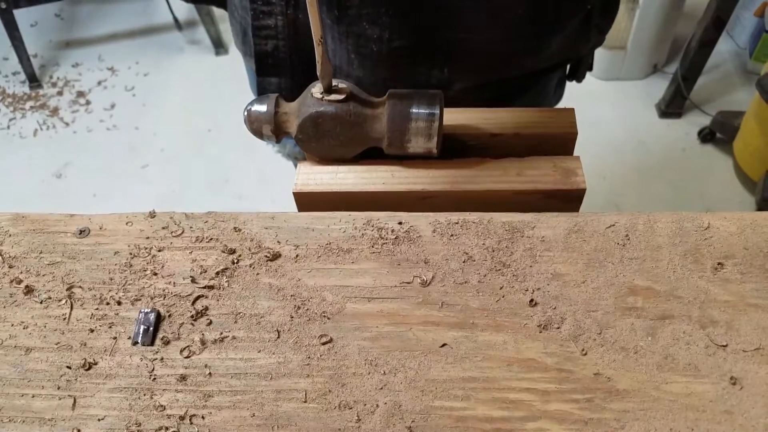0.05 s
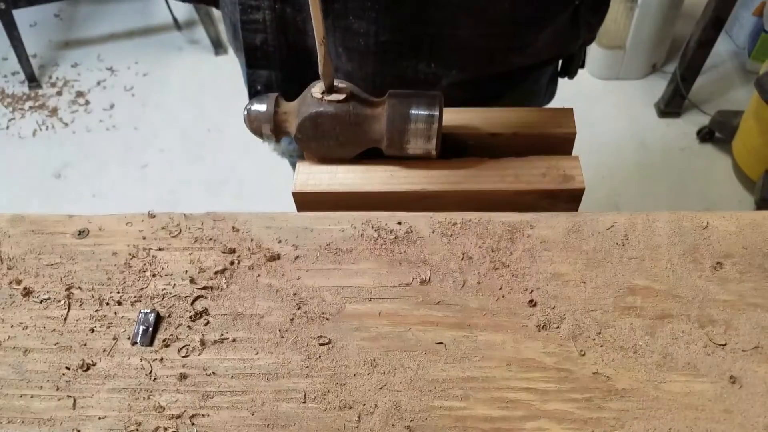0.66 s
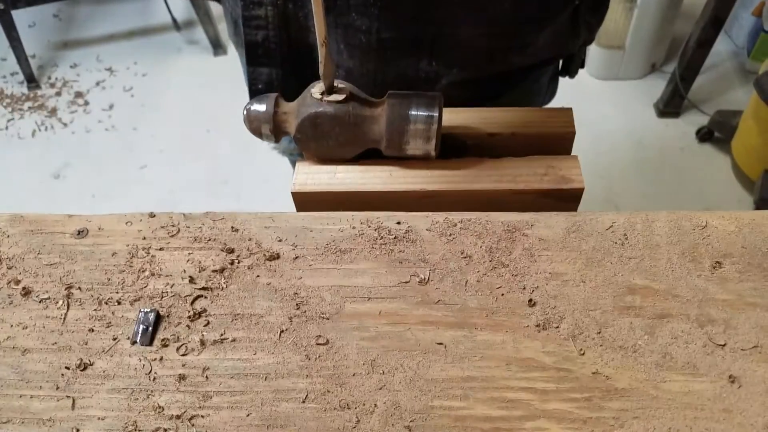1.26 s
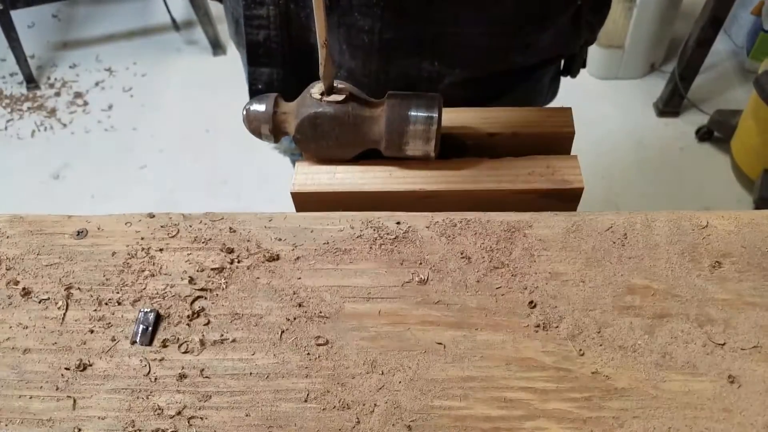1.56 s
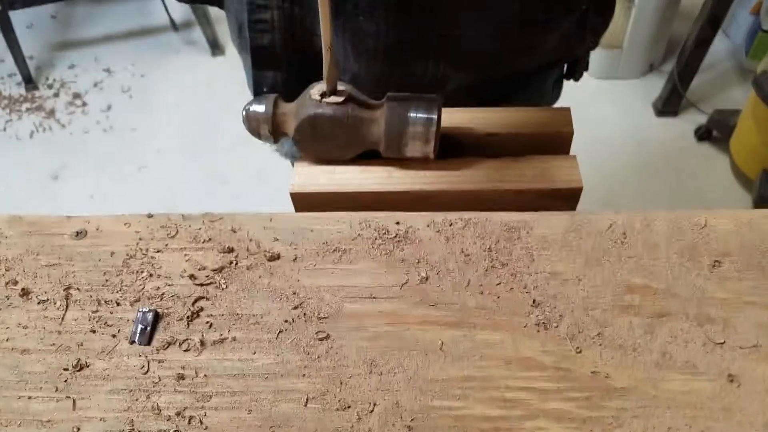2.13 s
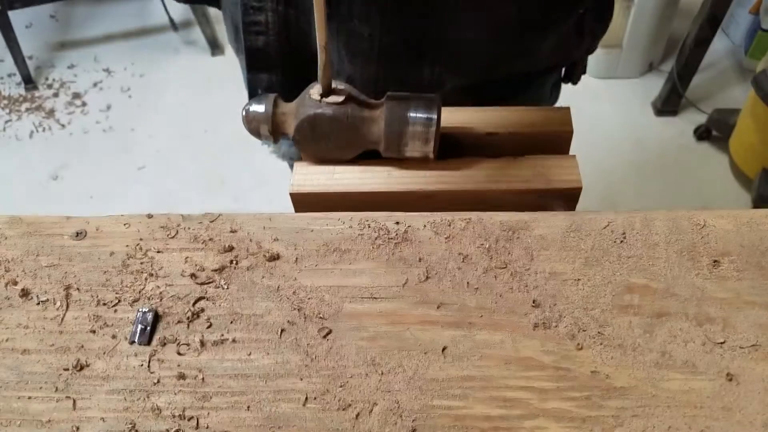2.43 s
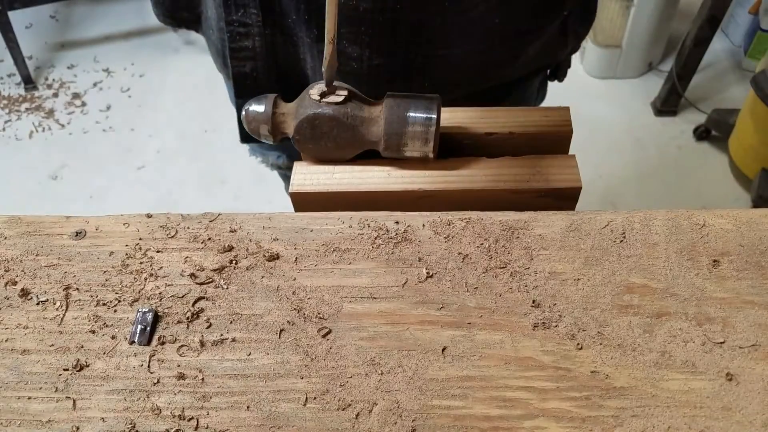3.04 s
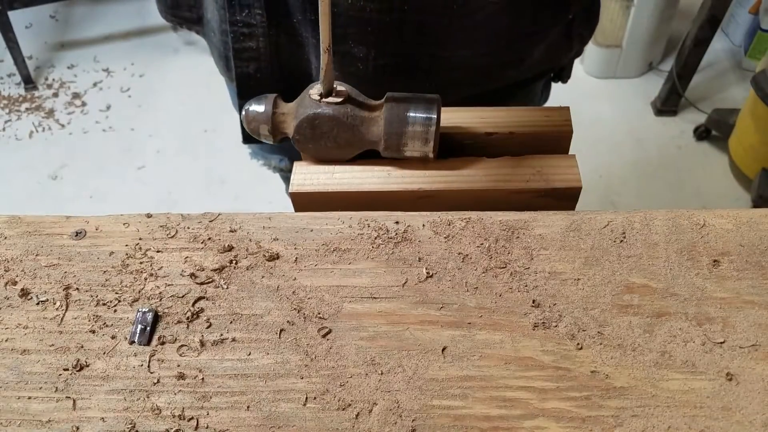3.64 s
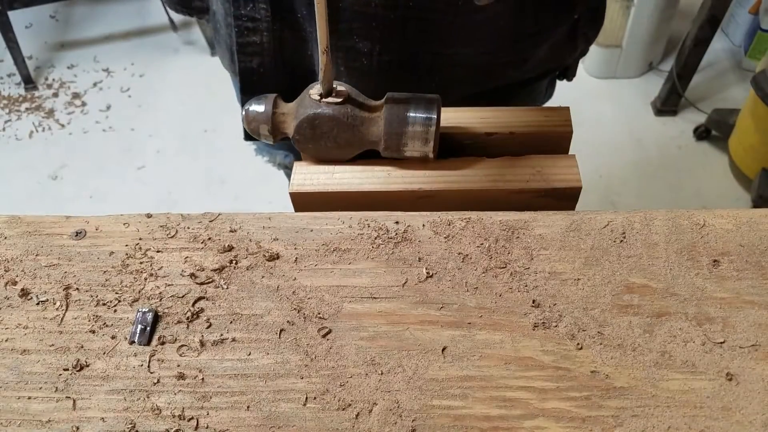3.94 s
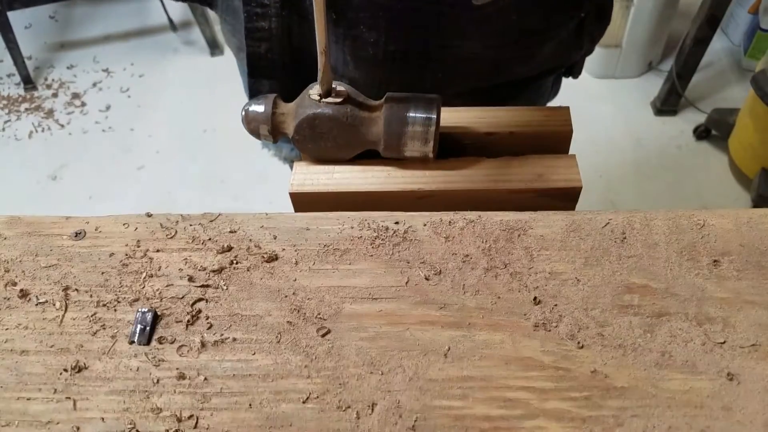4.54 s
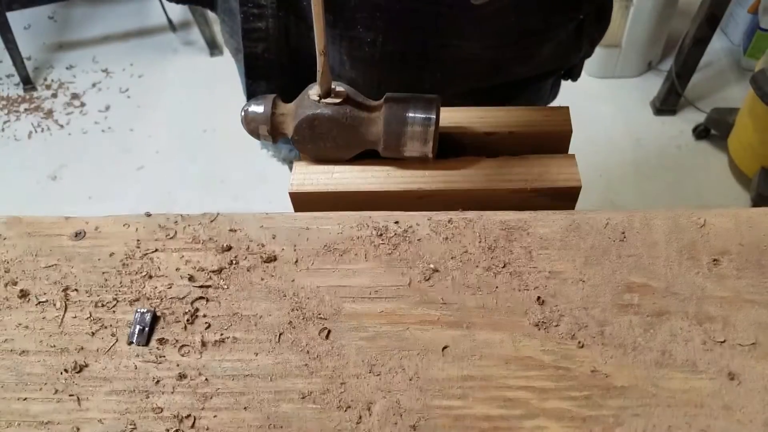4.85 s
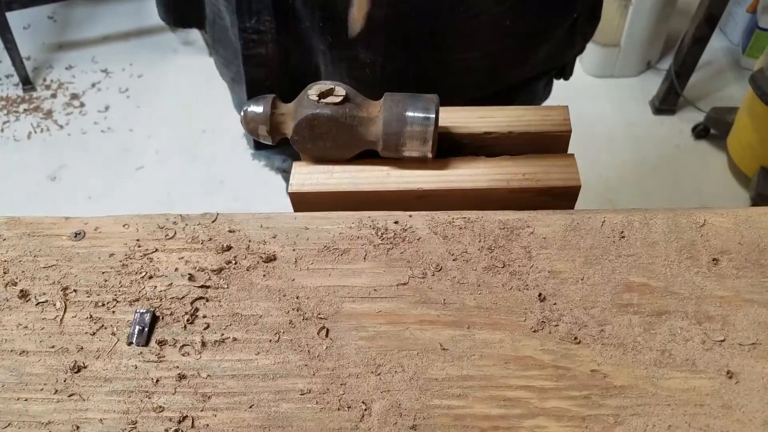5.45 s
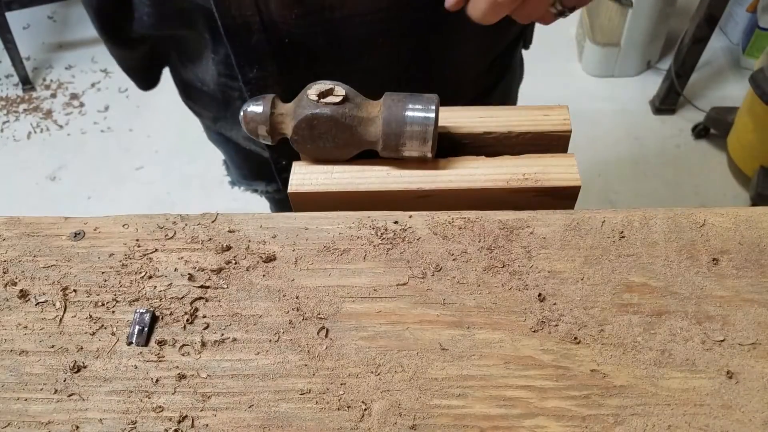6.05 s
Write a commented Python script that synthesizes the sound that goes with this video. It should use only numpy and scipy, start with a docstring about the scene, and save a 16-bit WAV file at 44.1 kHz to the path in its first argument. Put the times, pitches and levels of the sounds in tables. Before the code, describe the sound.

Close, steady hammering of steel on a screwdriver thumps through a wooden workbench, with brief ringing and loose pieces clacking. The blows stop for a few light ticks, then resume for four more strikes. A piston machine, probably a compressor, pulses rapidly on the left of the workshop, its hiss growing and swelling in the gaps. Finally the screwdriver lands on the bench with a quick clatter.

```python
"""A hammer drives a screwdriver against the wedge of a hammer head lying on wooden blocks on a bench.
Each blow is a steel click, a bench thump and a short ring of the tools; loose pieces clack after it.
The tip ticks on the wedge in a pause; at the end the screwdriver drops on the bench and rocks.
A piston machine, probably a compressor, throbs and hisses ever louder on the left.
Automatic gain control lifts it in the pauses; a limiter squashes the blows."""
import sys
import numpy as np
from scipy import signal
from scipy.fft import rfft, irfft, next_fast_len
from scipy.io import wavfile
from scipy.ndimage import minimum_filter1d

SR = 44100
rng = np.random.default_rng(int(sys.argv[2]) if len(sys.argv) > 2 else 0)


def inscribe(sig):
    """Save sig as 16-bit PCM at rate SR to the path in sys.argv[1].

    A 1-D sig is mono; a 2-D sig holds one channel per row.
    Samples are clipped to [-1, 1] before scaling.
    """
    pcm = np.round(np.clip(np.atleast_2d(sig).T, -1, 1) * 32767)
    wavfile.write(sys.argv[1], SR, pcm.astype(np.int16))


N = 277388
TIME = np.arange(N) / SR
RING_TIME = np.arange(int(.6 * SR)) / SR
STROKE_HZ = 16.147

# hammer blows: (time [s], force [dB])
BLOWS = [(-.125, 2), (0.2494, 1), (0.6231, 1), (1.0041, 0), (1.3658, 1.5), (1.7232, 2.5), (2.0907, 2.5),
         (2.4436, 1.5), (4.139, 4), (4.476, 2), (4.8254, 3), (5.1634, 3)]
# stereo balance: (frequency [Hz], left over right [dB])
BALANCE = [(60, 10.5), (200, 8), (400, 9), (700, 10), (1300, 6), (2500, 7), (5000, 1.5), (9000, 1.5),
           (15000, 1)]
# left-right likeness: (frequency [Hz], correlation [-1..1])
CORRELATION = [(60, 1), (200, 0.88), (400, 0.81), (700, -0.12), (1400, -0.18), (3000, 0.23), (6000, -0.22),
               (15000, 0.064)]
# narrow room peaks and dips: one value per 50 Hz and channel
ROOM_RIPPLE = rng.standard_normal((2, 442))


def amp(db):
    """Decibels to amplitude."""
    return 10 ** (np.asarray(db) / 20)


def read(points, hz):
    """Table lookup, linear over log frequency."""
    f, value = np.transpose(points)
    return np.interp(np.log(hz + 1), np.log(f + 1), value)


def add(mix, time_s, sound):
    """Mixes a stereo sound in, cropped to the scene."""
    start = round(time_s * SR)
    sound = sound[:, max(-start, 0):]
    part = mix[:, max(start, 0):][:, :sound.shape[1]]
    part += sound[:, :part.shape[1]]


def noise(spectrum, size=len(RING_TIME), ripple_db=3):
    """Partly correlated stereo noise, coloured by spectrum (Hz, dB) and the room."""
    hz = np.fft.rfftfreq(size, 1 / SR)
    left, other = rfft(rng.standard_normal((2, size)))
    corr = read(CORRELATION, hz)
    right = (corr * left + np.sqrt(1 - corr ** 2) * other) * amp(-read(BALANCE, hz))
    ripple = np.array([np.interp(hz, np.linspace(0, SR / 2, len(r)), r) for r in ROOM_RIPPLE])
    ripple *= hz / (hz + 600)  # smoother in the bass
    return irfft(np.array([left, right]) * amp(read(spectrum, hz) + ripple_db * ripple), size)


def long_noise(spectrum):
    """Scene-long coloured noise."""
    return noise(spectrum, next_fast_len(N))[:, :N]


def tone(hz, db, cycles):
    """Steady stereo sine; hz sets the balance."""
    return amp([[db], [db - read(BALANCE, hz)]]) * np.sin(2 * np.pi * cycles)


def fade(t60_s):
    """Exponential decay, 60 dB in t60_s."""
    return np.exp(-np.log(1000) * RING_TIME / t60_s)


def onset(rise_s):
    """Smooth rise from silence."""
    return 1 - np.exp(-(RING_TIME / rise_s) ** 2)


def hammer(click_db=-2, ring_db=-1, thump_db=-1.5, bite_db=-7, bite_hz=2510, fresh_share=0.39):
    """Steel meets steel, then the bench answers; part of its boom varies with the contact point."""
    # hammer skips and touches again: (time [s], click level [dB])
    skips = [(4.1482, 3), (4.1526, 2)]
    bench_delay_s = 0.001221  # travel down the screwdriver
    out = np.zeros((2, N))
    common_boom = bench_boom()
    thump = amp(thump_db) * bench_thump()
    bite = amp(bite_db) * np.sin(2 * np.pi * bite_hz * RING_TIME) * fade(0.0095) * onset(0.00095)
    for time_s, force_db in BLOWS:
        boom = np.sqrt(1 - fresh_share) * common_boom + np.sqrt(fresh_share) * bench_boom()
        steel = bite + amp(click_db) * click() + amp(ring_db) * steel_ring()
        add(out, time_s, amp(force_db) * steel)
        add(out, time_s + bench_delay_s, amp(force_db) * (boom * onset(0.0014) + thump))
    for time_s, db in skips:
        add(out, time_s, amp(db) * click())
    return out


def click(t60_s=0.019):
    """A few milliseconds of hard contact."""
    # steel on steel: (frequency [Hz], level [dB])
    spectrum = [(300, -61), (900, -30.5), (1500, 0), (2000, 2), (2500, 2), (3200, -4), (4000, -16),
                (7000, -13), (9000, -27.5), (11000, -22), (15500, -28)]
    return noise(spectrum) * fade(t60_s) * onset(0.0004)


def steel_ring(max_detune=0.00303, partials=4):
    """The tools ring; each mode is a cluster of close, beating partials."""
    # shank and hammer heads: (frequency [Hz], level [dB], t60 [s])
    modes = [(1920, -42, .25), (2210, -39, .28), (2460, -33, .26), (2915, -32, .28), (3040, -33, .3),
             (4735, -39, .34), (5855, -45, .29), (6150, -44, .29), (6605, -49, .23), (9170, -49, .32),
             (14790, -40, .27), (14950, -46, .24)]
    out = np.zeros((2, len(RING_TIME)))
    for hz, db, t60_s in modes:
        partial_hz = hz * (1 + max_detune * rng.uniform(-1, 1, (2, partials, 1)))
        cycles = partial_hz * RING_TIME + rng.random((2, partials, 1))
        cluster = np.sin(2 * np.pi * cycles).sum(1) / np.sqrt(partials)
        out += amp([[db], [db - read(BALANCE, hz)]]) * fade(t60_s) * cluster
    return out * onset(0.0014)


def bench_thump(rise_s=0.003):
    """Damped bench modes of alternating sign, weaker and phase-shifted on the right."""
    # bench and blocks: (frequency [Hz], level [dB], t60 [s])
    modes = [(53.8, -29.5, 0.79), (79.4, -24, 0.44), (82.3, -29, 0.19), (95.2, -19, 0.26),
             (127.1, -2.5, 0.21), (133.3, -11.5, 0.18), (157, -12.5, 0.34), (176.65, -14.5, 0.48),
             (198.6, -12.5, 0.18), (237.5, 1, 0.085), (267.6, -18.5, 0.77), (274.5, -0.5, 0.092),
             (341.4, -19.5, 0.3), (408.6, -20.5, 0.37), (465.3, -14, .22), (582, -19.5, 0.27),
             (689, -13, 0.23), (1100, -44, 0.41)]
    out = np.zeros((2, len(RING_TIME)))
    for k, (hz, db, t60_s) in enumerate(modes):
        phase = 2 * np.pi * hz * RING_TIME
        lag_rad = np.arccos(read(CORRELATION, hz))
        stereo = np.array([np.sin(phase), amp(-read(BALANCE, hz)) * np.sin(phase - lag_rad)])
        out += (-1) ** k * amp(db) * fade(t60_s) * stereo
    return out * onset(rise_s)


def bench_boom():
    """Dense small modes and reflections; each band decays at its own rate."""
    # bench and room: (frequency [Hz], level [dB])
    spectrum = [(25, -32), (70, -19), (130, 0), (300, 7.5), (650, 3.5), (1100, -0.5), (1600, -6),
                (2700, -15), (3600, -23.5), (6200, -29.5), (8500, -39.5), (11000, -38.5), (15500, -42)]
    # their decay: (frequency [Hz], t60 [s])
    decay_times = [(60, 0.89), (300, 0.34), (1000, 0.31), (3000, 0.33), (8000, 0.31), (15000, 0.17)]
    hz, time_s, bands = signal.stft(noise(spectrum), SR, nperseg=512)
    bands *= np.exp(-np.log(1000) * time_s / read(decay_times, hz)[:, None])
    return signal.istft(bands, SR)[1][:, :len(RING_TIME)]


def chatter(flight_s=.05, spread_s=0.015, level_db=-11, spread_db=2, t60_s=0.078, clacks=3):
    """Small clacks after each blow, probably the blocks and a spare wedge hopping."""
    # loose pieces falling back: (frequency [Hz], level [dB])
    spectrum = [(300, -27), (1300, -4.5), (2400, -7.5), (3600, -19.5), (6500, -25), (8500, -48),
                (10400, -29.5), (12000, -64), (15500, -37)]
    out = np.zeros((2, N))
    envelope = (fade(t60_s) * onset(0.0005))[:SR // 10]
    for time_s, force_db in BLOWS:
        for late, strength in rng.standard_normal((clacks, 2)):
            clack = noise(spectrum, len(envelope)) * envelope
            db = force_db + level_db + spread_db * strength
            add(out, time_s + flight_s + spread_s * late, amp(db) * clack)
    return out


def compressor(first_stroke_s=.047, loose_db=-8):
    """Pump partials swell together and the casing clatters once a stroke; the motor hums."""
    # pump throb: (multiple of stroke rate [1], level [dB])
    harmonics = [(6, -55), (7, -35.5), (8, -41), (9, -40), (10, -58.5), (11, -50), (12, -52), (16, -49.5),
                 (17, -64)]
    # motor and casing tones: (frequency [Hz], level [dB])
    hum_tones = [(120, -38.5), (240, -37.5), (307, -54.5), (360, -51), (387.5, -52), (533, -56.5),
                 (597.4, -51), (662, -51.5), (872, -55.5)]
    # casing clatter: (frequency [Hz], level [dB])
    casing = [(30, -51), (70, -43), (110, -15.5), (200, -35), (380, -25.5), (480, -32.5), (660, -27.5),
              (1100, -43.5), (2200, -46.5), (3500, -58.5), (7000, -75), (15000, -74)]
    strokes = STROKE_HZ * (TIME - first_stroke_s)
    throb = sum(tone(k * STROKE_HZ, db, k * strokes) for k, db in harmonics)
    hum = sum(tone(hz, db, hz * TIME + rng.random()) for hz, db in hum_tones)
    period = round(SR / STROKE_HZ)
    clatter = noise(casing, period)[:, np.arange(N) % period]
    return throb + hum + clatter + amp(loose_db) * long_noise(casing)


def air(leak_db=-25.5, ramp_start_s=2.36, flow_per_s=0.25, first_puff_s=0.0089, puff_depth=0.21):
    """A faint leak grows to a rush; the valves give a whistling chuff at each opening."""
    # valve whistles: (frequency [Hz], half width [Hz], level [dB])
    valves = [(872, 61, -6.5), (2260, 57, -20.5), (5190, 30, -34.5)]
    # rushing air: (frequency [Hz], level [dB])
    spectrum = [(200, -41), (500, -29.5), (900, -19), (1150, -32.5), (1500, -29.5), (2200, -33),
                (3200, -37.5), (3800, -42), (5100, -42.5), (5230, -36.5), (5400, -47), (7200, -46),
                (9000, -65), (11500, -57.5), (14000, -62.5), (15400, -53.5)]
    flow = amp(leak_db) + flow_per_s * np.maximum(TIME - ramp_start_s, 0)  # 1 = full flow
    opening = (1 + np.cos(2 * np.pi * STROKE_HZ * (TIME - first_puff_s))) / 2
    hz = np.geomspace(100, 16000, 900)
    resonance = sum(amp(db) / (1 + ((hz - centre) / width) ** 4) for centre, width, db in valves)
    whistles = long_noise(np.c_[hz, 20 * np.log10(resonance)]) * opening ** 2
    rush = long_noise(spectrum) * (1 + puff_depth * (2 * opening - 1))
    return rush * flow + whistles * flow ** 2.65  # whistles grow faster than the rush


def tip(settle_s=0.014, settle_db=2, settle_pitch_ratio=.85):
    """The tip is set back on the wedge and settles with a second, lower tick."""
    # touches: (time [s], level [dB], pitch [Hz])
    touches = [(3.098, -32.5, 1210), (3.242, -37, 1210), (3.508, -39, 1370)]
    out = np.zeros((2, N))
    for time_s, db, hz in touches:
        add(out, time_s, amp(db) * tick(hz))
        add(out, time_s + settle_s, amp(db + settle_db) * tick(hz * settle_pitch_ratio))
    return out


def tick(hz, width_hz=170, t60_s=0.074):
    """Pitched tick of the blade: a burst of narrowband noise."""
    band = [(hz - 2 * width_hz, -45), (hz - width_hz / 2, 0),
            (hz + width_hz / 2, 0), (hz + 3 * width_hz, -50)]
    grain = noise(band)
    return grain / grain[0].std() * fade(t60_s) * onset(0.00066)


def landing(landing_hz=1320, rocking_hz=520, dulling_s=0.024, click_loss_db_per_s=400, room_db=-13):
    """The screwdriver hits the bench and rocks on its handle in softer, duller knocks."""
    # landing and rocking: (time [s], level [dB])
    knocks = [(6.061, 6), (6.066, 4), (6.076, -3), (6.109, -7), (6.121, -7), (6.139, -9.5), (6.172, -8),
              (6.209, -7.5), (6.221, -17.5)]
    # handle on bench top: (frequency [Hz], level [dB])
    handle = [(40, -32), (120, 10), (250, 5.5), (450, 13.5), (700, 13), (1000, 9), (1600, 4.5), (3000, -4),
              (8000, -14), (15000, -13)]
    out = np.zeros((2, N))
    envelope = (fade(0.088) + amp(room_db) * fade(0.36)) * onset(0.0014)
    for time_s, db in knocks:
        since_s = time_s - knocks[0][0]
        cutoff_hz = rocking_hz + (landing_hz - rocking_hz) * np.exp(-since_s / dulling_s)
        click_db = -4.5 - click_loss_db_per_s * since_s
        knock = signal.lfilter(*signal.butter(2, cutoff_hz, fs=SR), noise(handle))
        add(out, time_s, amp(db) * (knock * envelope + amp(click_db) * click()))
    add(out, 6.1095, amp(-20) * tick(hz=3020, width_hz=300, t60_s=0.026))  # blade touches down once
    return out


def scene(machine_right_db=-2.0):
    """Bench work, with the machine to its left."""
    bench_work = hammer() + chatter() + tip() + landing()
    machine = compressor() + air()
    return bench_work + machine * amp([[0], [machine_right_db]])


def peak_db(x):
    """Instantaneous level of the louder channel."""
    return 20 * np.log10(abs(x).max(0) + 1e-9)


def recover(cut_db, db_per_s):
    """Gain cut with instant attack and constant release rate."""
    fall_db = TIME * db_per_s
    return np.maximum.accumulate(cut_db + fall_db) - fall_db


def record(dry, lift_db=17, cut_above_db=-22, hold_s=0.51, limit_above_db=1, cutoff_hz=15900):
    """Gain control lifts the pauses after a hold; then limiter, soft clip and low-pass."""
    cut_db = np.clip(2 * (peak_db(dry) - cut_above_db), 0, lift_db)
    cut_db[0] = lift_db  # hammering is already under way
    span = int(hold_s * SR)
    held_db = -minimum_filter1d(-cut_db, span, origin=(span - 1) // 2, mode="nearest")
    lifted = dry * amp(lift_db - recover(held_db, db_per_s=50))
    limit_db = recover(0.73 * np.maximum(peak_db(lifted) - limit_above_db, 0), db_per_s=170)
    pole = np.exp(-1 / (0.0067 * SR))  # 6.7 ms lag: the first swings reach the soft clip
    limited = lifted * amp(-signal.lfilter([1 - pole], [1, -pole], limit_db))
    clipped = limited / (1 + limited ** 8) ** (1 / 8)
    lowpass = signal.firwin(161, cutoff_hz, window=("kaiser", 9), fs=SR)
    return signal.oaconvolve(clipped, lowpass[None], "same", axes=1)


dry = scene()
out = record(dry)
inscribe(out)
```